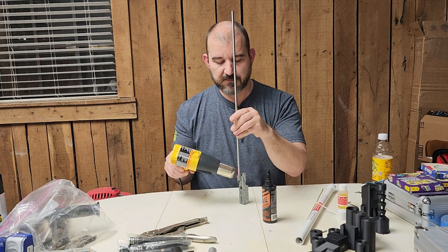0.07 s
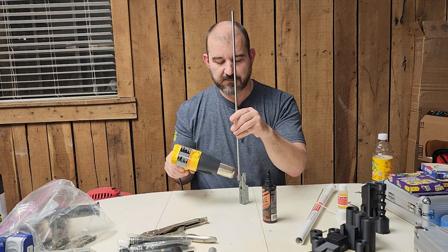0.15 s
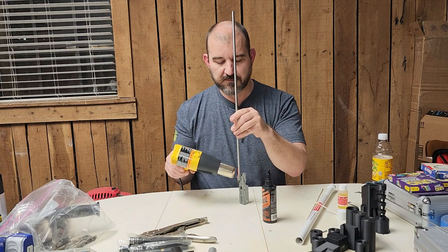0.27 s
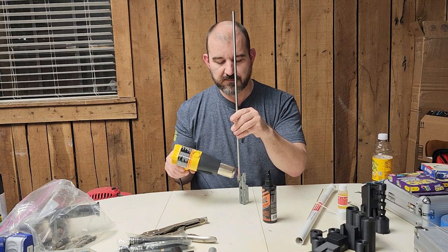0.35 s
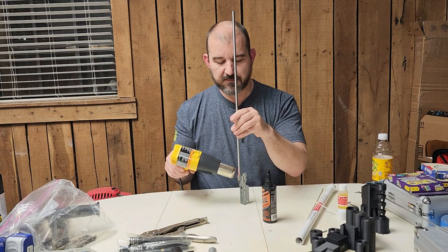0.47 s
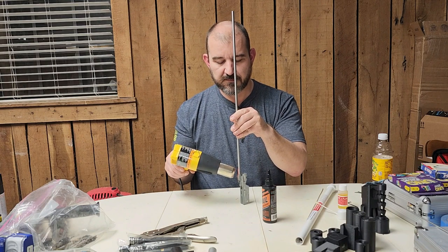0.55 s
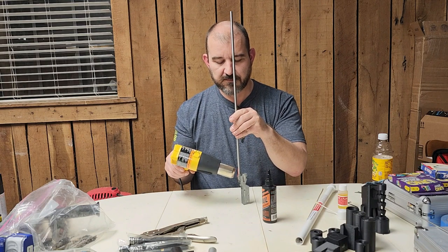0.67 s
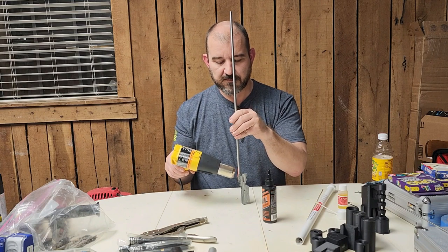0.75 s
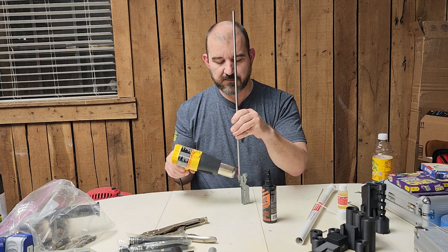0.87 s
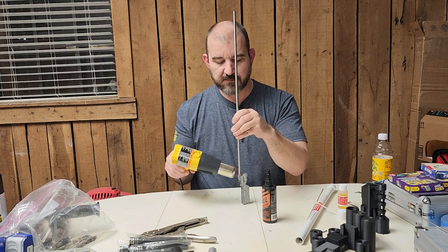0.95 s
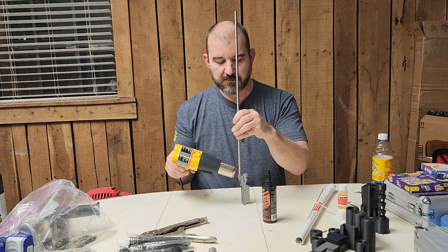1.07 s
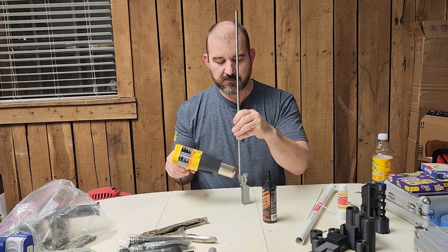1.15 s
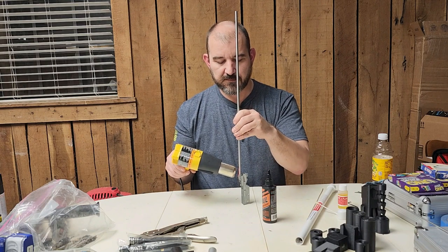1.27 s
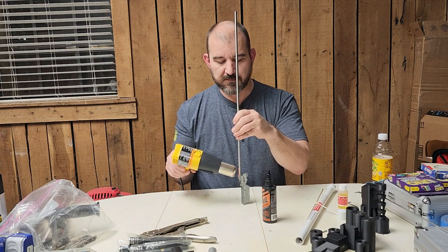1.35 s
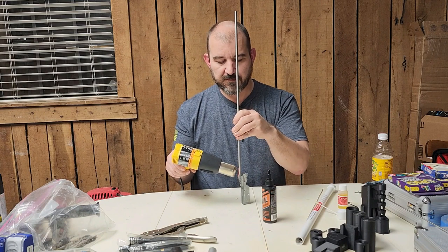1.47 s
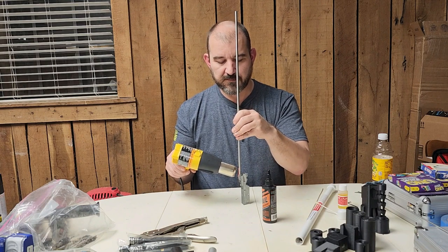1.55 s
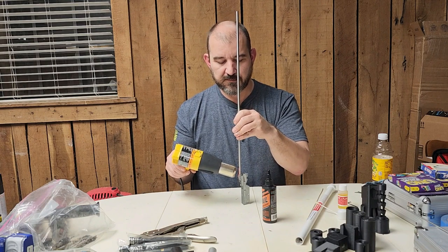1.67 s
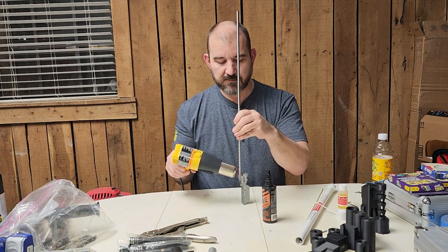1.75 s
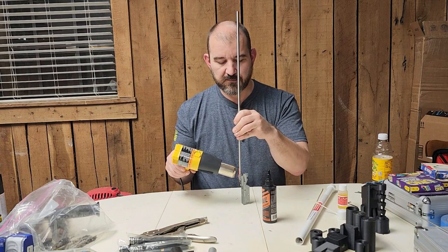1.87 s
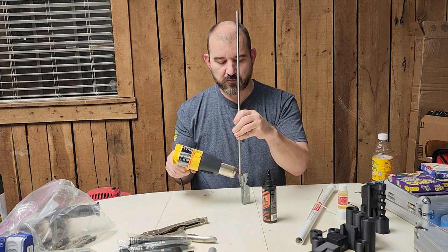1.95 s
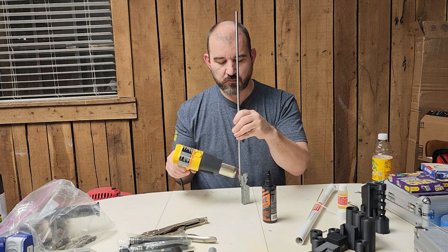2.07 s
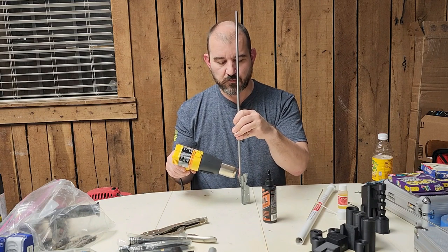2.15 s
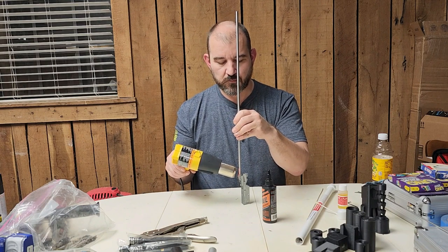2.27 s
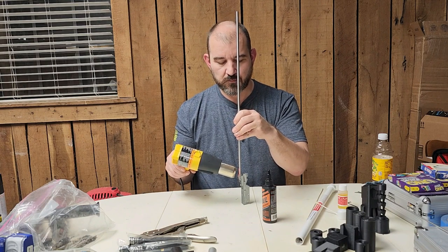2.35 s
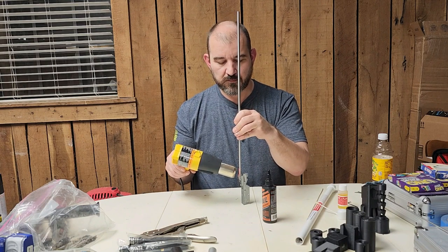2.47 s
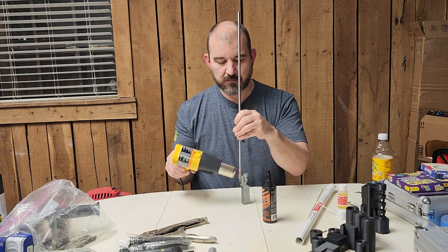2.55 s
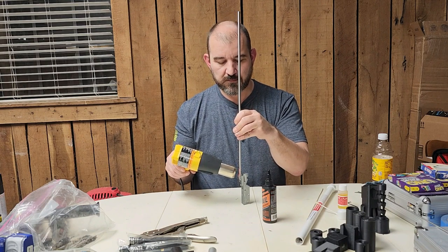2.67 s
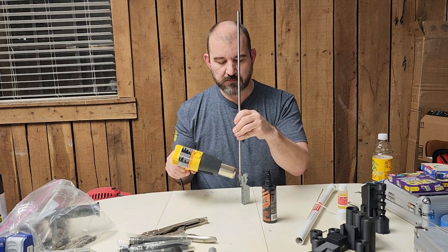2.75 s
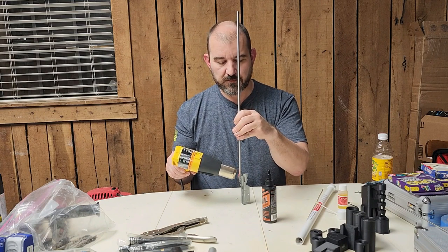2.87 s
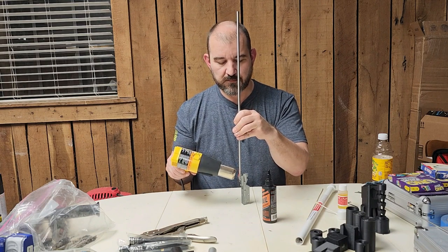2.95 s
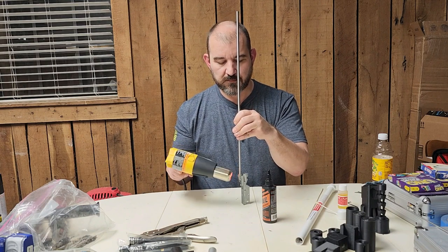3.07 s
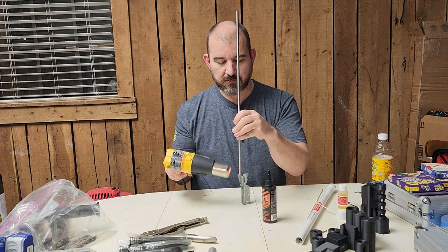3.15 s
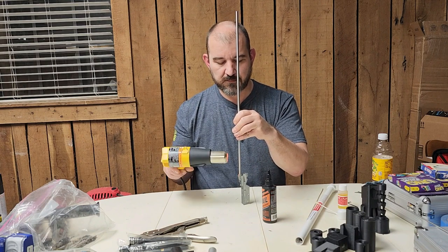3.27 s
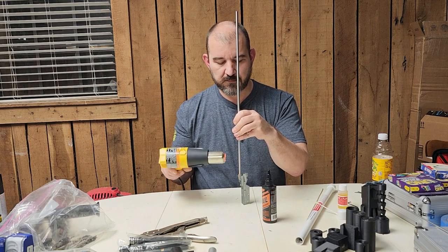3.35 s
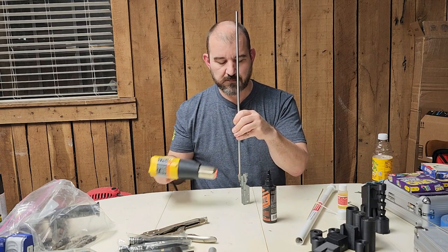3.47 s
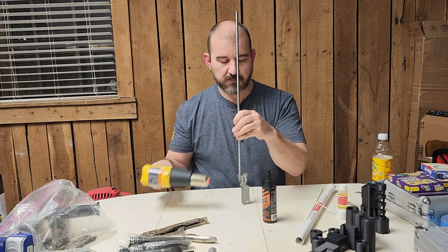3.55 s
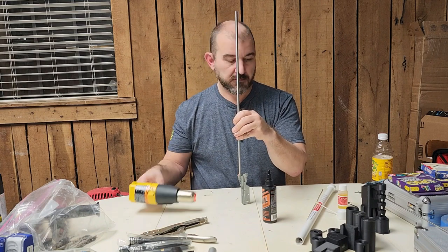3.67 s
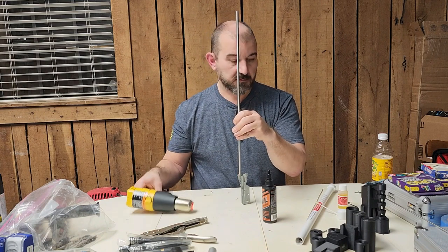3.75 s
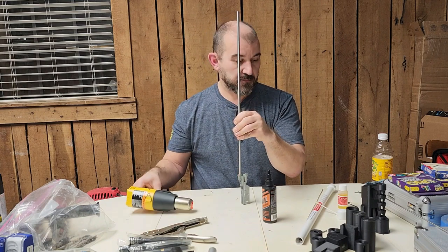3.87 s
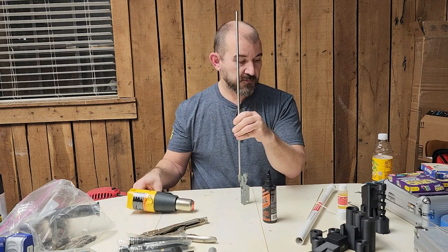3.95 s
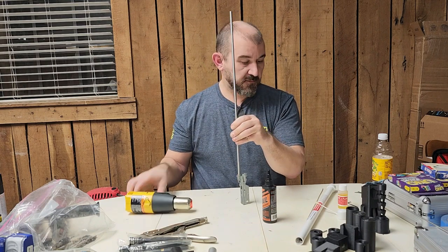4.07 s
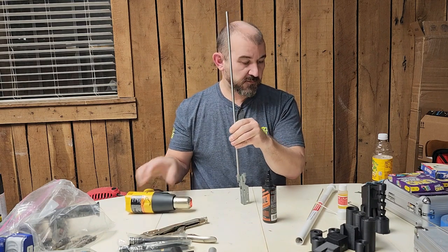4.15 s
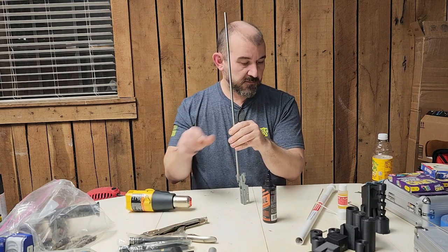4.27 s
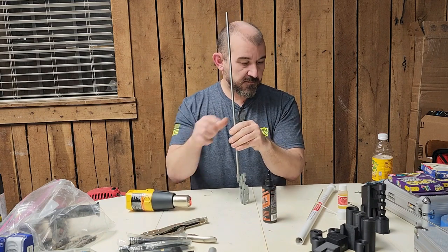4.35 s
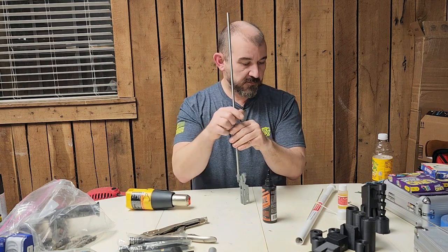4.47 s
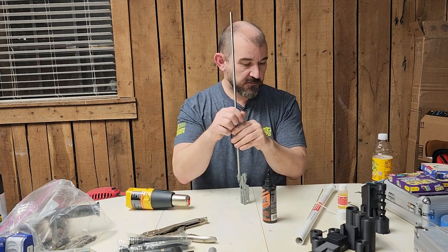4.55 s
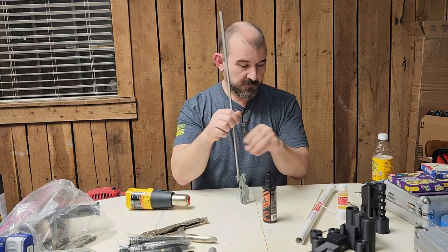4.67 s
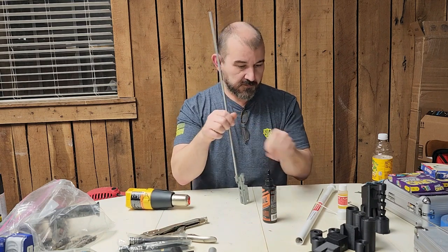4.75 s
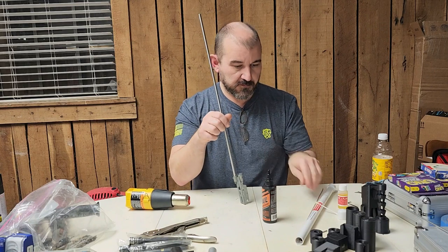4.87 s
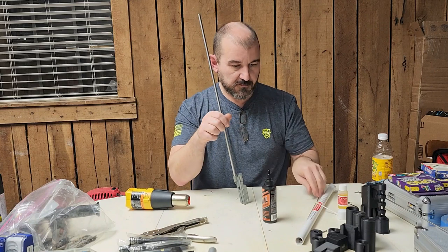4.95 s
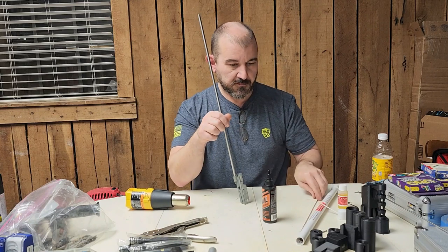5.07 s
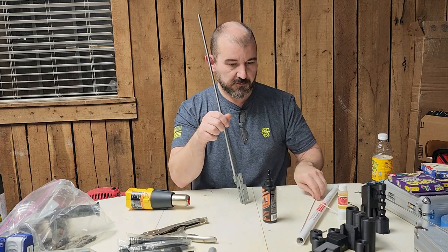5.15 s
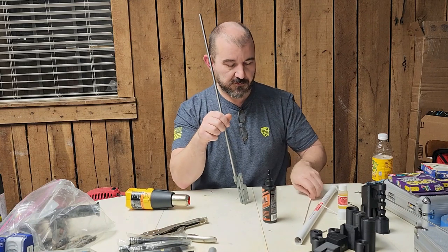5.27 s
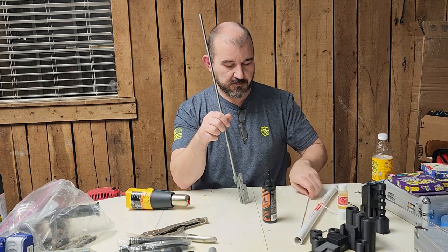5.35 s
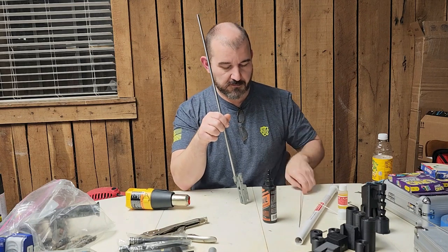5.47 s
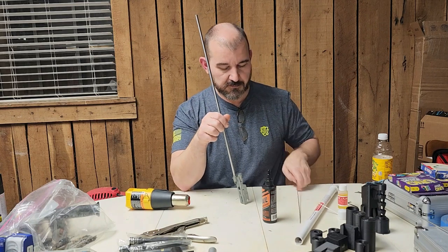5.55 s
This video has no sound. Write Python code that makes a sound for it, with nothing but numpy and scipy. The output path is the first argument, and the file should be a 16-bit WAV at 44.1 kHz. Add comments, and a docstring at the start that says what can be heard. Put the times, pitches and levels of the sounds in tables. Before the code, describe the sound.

Close stereo pickup in a short, dry room: constant buzzy fan whir and broad airflow, a small switch click with a dull body thud, then a quick fade of air. The gun meets the folding table with two sharp plastic knocks, a metallic nozzle clink and a few weaker bumps. Sleeves and fingers rustle faintly, with tiny ticks, above hum and ventilation rumble.

```python
"""Heat gun set down

A handheld heat gun whirs in a wooden workshop: motor tones follow the shaft speed, over rushing air noise.
It is switched off with a thud of its body and set down on a plastic folding table with two knocks and
some bounces, made of short pushes and cracks that ring the table, the gun body and the nozzle.
Hands and sleeves rustle as grainy noise, over the mains hum, noise rumble and faint hiss of the room."""
import sys
import numpy as np
from scipy import signal
from scipy.fft import rfft, irfft, next_fast_len
from scipy.io import wavfile

SR = 44100
rng = np.random.default_rng(int(sys.argv[2]) if len(sys.argv) > 2 else 0)


def inscribe(sig):
    """Save sig as 16-bit PCM at rate SR to the path in sys.argv[1].

    A 1-D sig is mono; a 2-D sig holds one channel per row.
    Samples are clipped to [-1, 1] before scaling.
    """
    pcm = np.round(np.clip(np.atleast_2d(sig).T, -1, 1) * 32767)
    wavfile.write(sys.argv[1], SR, pcm.astype(np.int16))


def amplitude_ratio(level_db):
    """Convert a level in decibels to the matching linear amplitude (field) ratio."""
    exponent = np.asarray(level_db, float) / 20
    return 10 ** exponent


N = 247401  # length in samples


def since(s):
    """Seconds gone by since a moment, 0 before it."""
    return np.maximum(np.arange(N) / SR - s, 0)


def window(start_s, end_s, edge_s):
    """1 between two times, with sloped edges."""
    t = np.arange(N) / SR
    return np.clip(np.minimum(t - start_s, end_s - t) / edge_s + .5, 0, 1)


def in_time(rows):
    """Columns of a curve table, one value a sample."""
    s, *columns = np.transpose(rows)
    return [np.interp(np.arange(N) / SR, s, c) for c in columns]


def at_hz(points, hz):
    """Read a table on a log-frequency axis."""
    p = np.array(points, float)
    return np.interp(np.log(np.maximum(hz, 1)), np.log(p[:, 0]), p[:, 1])


def rms_one(x):
    """Scale to unit rms."""
    return x / np.sqrt(np.mean(x ** 2) + 1e-20)


def drift(rate_hz):
    """Slow random wandering of spread 1, drawn every 64 samples."""
    r = np.exp(-2 * np.pi * rate_hz * 64 / SR)
    slow = signal.lfilter([1], [1, -2 * r, r * r], rng.standard_normal(N // 64 + 2002))
    slow = rms_one(slow[2000:])  # leave out the start of the filter
    return np.interp(np.arange(N) / 64, np.arange(len(slow)), slow)


def ring(clicks, modes):
    """Clicks set a bank of decaying sines ringing."""
    out = 0
    for hz, db, t60 in modes:
        r = amplitude_ratio(-60 / (t60 * SR))
        w = 2 * np.pi * hz / SR
        out = out + amplitude_ratio(db) * signal.lfilter([0, np.sin(w)], [1, -2 * r * np.cos(w), r * r], clicks + 1e-18)
    return out


# how alike left and right are in spread sound: (frequency [Hz], likeness [-1 to 1])
LIKENESS = [(60, 1), (130, 0.81), (290, 0.79), (640, 0.51), (1410, -0.046), (3100, 0.15), (6820, -0.3),
            (15000, -0.18)]


def stereo(mid, side, hz):
    """Mix two independent noises, or their spectra, so that left and right are as alike as the table says."""
    alike = np.clip(at_hz(LIKENESS, hz), -.99, .99)
    return np.sqrt(1 + alike) * mid + np.sqrt(1 - alike) * side * [[1], [-1]]


def spread_noise(spectrum, peaks=()):
    """Stereo noise of a given colour, as alike in the two channels as sound from all around; mid rms 1."""
    size = next_fast_len(N)
    hz = np.arange(size // 2 + 1) * SR / size
    db = at_hz(spectrum, hz)
    db = db + sum(lift / (1 + (2 * (hz - f) / w) ** 2) for f, w, lift in peaks)
    mid, side = rfft(rng.standard_normal((2, size))) * amplitude_ratio(db)
    out = irfft(stereo(mid, side, hz), size)[:, :N]
    return out / np.std(out.mean(axis=0))


SWITCH_OFF_S, COAST_S = 3.31, 0.77  # the shaft then slows with this time constant


def coasting_db():
    """Shaft speed against full speed, in dB: an exponential slowing after the switch."""
    return -20 / np.log(10) * since(SWITCH_OFF_S) / COAST_S


# shaft speed while powered: (time [s], speed [turns per s])
SPEED = [(0, 235.35), (.45, 235.5), (.9, 235.15), (1.2, 235.5), (1.7, 235.18), (2.1, 235.6), (2.65, 235.87),
         (3.0, 235.7)]
# motor tones: (multiple of the shaft speed, rms level [dB], left against right [dB])
TONES = [(1, -47.5, 1), (2, -49, 2), (3, -48, 0), (4, -67, 0), (5, -66, -5), (6, -53, 7), (7, -56, 8),
         (8, -56, 15), (9, -62, 14), (10, -55, 7), (11, -50, 1), (12, -61, 0), (13, -62, 11), (14, -66, 7),
         (15, -66, 12), (16, -64, 13), (17, -60, 11), (18, -62, 3), (19, -70, 8), (20, -64, 11),
         (21, -67, 7), (22, -65, 10), (23, -74, 3), (24, -64, 12), (25, -72, 3), (26, -72, 10),
         (27, -74, 8), (28, -69, 6), (29, -73, 8), (30, -72, 11), (31, -73, 9), (32, -71, 10), (33, -75, 7),
         (34, -78, 5), (35, -74, 5), (36, -75, 6)]
# side lines that stand out: (multiple, +1 above or -1 below, rms level [dB])
LOUD_SIDES = [(3, 1, -65), (4, -1, -67), (5, 1, -67), (7, -1, -64), (10, 1, -64), (10, -1, -67),
              (11, -1, -59)]
# tones that swell or sink while the hand turns the gun: (multiple, start [s], length [s], change [dB])
TURNS = [(3, 2.9, 0.61, -4.5), (6, 2.3, 0.55, 1), (8, 2.2, 0.87, 1), (11, 2.1, 1.8, -2),
         (12, 3.11, 0.12, 11), (14, 3.19, .06, 12), (16, 3.06, 0.18, 9)]
RIPPLE_HZ = 119.95
SIDE_LINE_DB = -38  # other side lines against a first tone; they grow in proportion to the multiple
LIFT_S, LIFT_FADE_DB_PER_S = 2.95, 13  # the gun is lifted away and its tones fade
TONE_DEATH_DB_PER_S = 150  # without current the tones die fast


def motor():
    """Tones on the shaft multiples; the rectified supply adds a side line below and above each."""
    speed = in_time(SPEED)[0] * amplitude_ratio(coasting_db()) + 0.054 * drift(7.3)
    running = int((SWITCH_OFF_S + .25) * SR)
    turn = (2 * np.pi * np.cumsum(speed) / SR)[:running]
    ripple = 2 * np.pi * RIPPLE_HZ * np.arange(running) / SR
    out = np.zeros((2, N))
    loud = {(k, way): db for k, way, db in LOUD_SIDES}
    for k, db, pan_db in TONES:
        start = rng.uniform(0, 2 * np.pi, 3)
        lag = rng.normal(0, min(0.045 * k, 2.0))  # radians; high tones reach the two microphones out of step
        # the hand moves the gun through the room pattern
        waver = amplitude_ratio(min(.2 + .11 * k, 1.5) * drift(4)[:running])
        for multiple, start_s, length_s, turn_db in TURNS:
            if round(multiple) == k:
                waver = waver * amplitude_ratio(turn_db * window(start_s, start_s + length_s, 0.023)[:running])
        usual_db = db + SIDE_LINE_DB + 20 * np.log10(k)
        below = amplitude_ratio(loud.get((k, -1), usual_db)) * np.exp(1j * (start[1] - ripple))
        above = amplitude_ratio(loud.get((k, 1), usual_db)) * np.exp(1j * (start[2] + ripple))
        wave = np.exp(1j * (k * turn + start[0])) * (amplitude_ratio(db) + below + above)
        sides = np.array([amplitude_ratio(pan_db / 2), amplitude_ratio(-pan_db / 2) * np.exp(1j * lag)])
        level = np.sqrt(8) / max(abs(sides.sum()), 1)  # the table level holds for the mean of both channels
        out[:, :running] += np.real(sides[:, None] * wave) * waver * level
    return out * amplitude_ratio(-LIFT_FADE_DB_PER_S * since(LIFT_S) - TONE_DEATH_DB_PER_S * since(SWITCH_OFF_S))


ECHO_COUNT, ECHO_DB = 7, -19
ECHO_FIRST_S, ECHO_LAST_S = 0.0036, .03


def near_echoes(x):
    """Table, body and back wall return a few copies, which ripple the colour of a steady sound."""
    out = x.copy()
    for share, sign in rng.random((ECHO_COUNT, 2)):
        lag = 1 + int((ECHO_FIRST_S + share * (ECHO_LAST_S - ECHO_FIRST_S)) * SR)
        out += amplitude_ratio(ECHO_DB) * np.sign(sign - .5) * np.roll(x, lag, axis=1)
    return out / np.sqrt(1 + ECHO_COUNT * amplitude_ratio(2 * ECHO_DB))


# colour of the rushing air: (frequency [Hz], relative level per Hz [dB])
AIR = [(120, -36.5), (200, -5), (240, -12.5), (311, -17), (465, -8), (519, -13), (709, -9.5), (1120, -8.5),
       (1400, -7.5), (2210, -9), (2560, -5.5), (2860, -12), (9930, -31), (11900, -20), (16000, -38)]
# resonances of barrel and housing in the air noise: (frequency [Hz], width [Hz], lift [dB])
BARREL = [(566, 79, 8), (632, 41, 8), (867, 79, 7.5), (1137, 68, -5), (1350, 120, 3.5), (1441, 54, 5.5),
          (1590, 150, -3.5), (2370, 430, -4), (2750, 510, 0.5), (2870, 220, -5.5), (3604, 240, -11),
          (3734, 620, 8), (4700, 770, -3.5), (5480, 300, 3), (7700, 1600, 7), (11960, 1040, -4.5)]
AIR_DB = -41.5
AIR_POWER, TREBLE_POWER = 4.3, 5.4  # jet pressure goes as speed to this power, its treble by a further power


def air():
    """The fan's jet is coloured noise; the treble dies first as it slows."""
    jet = near_echoes(spread_noise(AIR, BARREL))
    treble = signal.sosfilt(signal.butter(1, 3500, "high", fs=SR, output="sos"), jet)
    level = amplitude_ratio(AIR_DB + AIR_POWER * coasting_db() + 0.25 * drift(13.0))
    return level * (jet + (amplitude_ratio(TREBLE_POWER * coasting_db()) - 1) * treble)


# blows on the table and gun body; the first is the body thud of the switch:
# (time [s], push into the table [dB], contact hardness [Hz], push into the gun body against it [dB],
#  crack level [dB])
BLOWS = [(3.345, -56, 1300, 24, -74), (3.6209, -39.5, 1990, 12, -41.5), (3.8087, -36.5, 2360, 17, -25),
         (3.8104, -18, 2460, 7.5, -33), (3.859, -44, 2400, 15, -67), (3.9593, -22, 2460, 14, -20),
         (3.9613, -17.5, 2380, -2, -28.5), (4.0709, -24.5, 800, -9, -50), (4.117, -26, 800, 0, -46),
         (4.132, -35.5, 800, 15.5, -64), (4.176, -31.5, 1190, -9, -66), (4.209, -45.5, 2400, -1, -74),
         (4.353, -42, 447, 20, -72), (4.405, -45, 454, 26, -74), (4.498, -44, 463, 30, -64),
         (5.051, -45.5, 696, 13, -72), (5.151, -52.5, 2400, 9, -58), (5.389, -60, 2000, -2, -74)]
# table top modes: (frequency [Hz], level [dB], time to fall 60 dB [s])
TABLE = [(135.4, -9, 0.064), (169, -0.5, 0.057), (211.6, -6, 0.088), (304.6, -9.5, 0.18), (359, -0.5, 0.13),
         (445, -4.5, 0.16), (514, -7, 0.0096), (530, -5, .1), (613, -10, 0.11), (664, -6.5, 0.15)]
# gun body modes: (frequency [Hz], level [dB], time to fall 60 dB [s])
BODY = [(602.5, -10.5, 0.14), (838, -16, 0.12), (912, -11, 0.056), (1300, -32, .04), (1410, -6, 0.1),
        (1502, 1, 0.033), (1643, -4.5, 0.078), (1980, -26.5, 0.027), (3010, -3, 0.026)]
# colour of crack and rattle: (frequency [Hz], relative level per Hz [dB])
CRACK = [(800, -5.5), (2000, 10.5), (2600, 0.5), (3300, 4.5), (5000, -5.5), (7500, -5), (10000, -17.5),
         (12000, -10), (16000, -23.5)]
CRACK_RISE_S, CRACK_T60_S = 0.0011, 0.016
RATTLE_T60_S, RATTLE_DB = 0.18, -10.5  # level against the crack
TABLE_LAG_S = 0.0005  # the bending wave needs time to move the whole top


def blows():
    """Low-passed pushes ring table top and gun body, with a noisy crack and a short rattle of loose parts."""
    top, body, crack = np.zeros((3, N))
    push = np.r_[1., np.zeros(2047)]
    t = np.arange(SR // 5) / SR
    dying = amplitude_ratio(-60 * t / CRACK_T60_S) + amplitude_ratio(RATTLE_DB - 60 * t / RATTLE_T60_S)
    dying = dying * (1 - np.exp(-t / CRACK_RISE_S))
    lag = int(TABLE_LAG_S * SR)
    for s, db, hard_hz, body_db, crack_db in BLOWS:
        r = np.exp(-2 * np.pi * hard_hz / SR)  # harder contacts push more briefly
        force = amplitude_ratio(db) * signal.lfilter([(1 - r) ** 4], np.poly([r, r, r, r]), push)
        at = int(s * SR)
        top[at + lag:at + lag + len(push)] += force
        body[at:at + len(push)] += amplitude_ratio(body_db) * force
        crack[at:at + len(t)] += amplitude_ratio(crack_db) * dying
    return ring(top, TABLE) + ring(body, BODY) + crack * spread_noise(CRACK).mean(axis=0)


# the metal nozzle lands with a bounce: (time [s], strength [dB])
NOZZLE_HITS = [(3.9589, -16), (4.007, -43.5)]
# nozzle modes: (frequency [Hz], level [dB], time to fall 60 dB [s])
NOZZLE = [(743, 5.5, 0.046), (1092, -1, 0.069), (1200, -11, 0.059), (1587, -8.5, .03), (1577, 2.5, 0.06),
          (1840, -1.5, 0.078), (2290, -11, .06), (2780, -17, 0.049)]
NOZZLE_HARD_HZ = 3500


def nozzle():
    """Single clicks, softened by a low-pass, ring the metal nozzle."""
    clicks = np.zeros(N)
    for s, db in NOZZLE_HITS:
        clicks[int(s * SR)] = amplitude_ratio(db)
    clicks = signal.lfilter(*signal.butter(2, NOZZLE_HARD_HZ, fs=SR), clicks + 1e-18)
    return ring(clicks, NOZZLE)


# switch and small hard ticks: (time [s], starting level, twice the rms [dB],
#                               centre frequency [Hz], time to fall 60 dB [s])
TICKS = [(3.208, -40, 12800, 0.015), (3.259, -26.5, 5930, 0.012), (3.272, -43, 10750, 0.013),
         (3.334, -31, 12000, 0.026), (3.344, -31, 2500, 0.045), (4.31, -59.5, 10540, 0.079),
         (4.361, -59.5, 11330, 0.081), (4.497, -58.5, 7000, 0.029), (5.087, -57.5, 9500, 0.098),
         (5.151, -63, 2550, .03), (5.191, -48, 2520, .04)]
TICK_OCTAVES = 1.1  # spread around the centre


def ticks():
    """Short dying noise bursts around a centre pitch."""
    out, t = np.zeros(N), np.arange(8192) / SR
    hz = np.maximum(np.arange(4097) * SR / 8192, 1)
    for s, db, centre_hz, t60 in TICKS:
        band = np.exp(-(np.log2(hz / centre_hz) / TICK_OCTAVES) ** 2)
        burst = rms_one(irfft(rfft(rng.standard_normal(len(t))) * band))
        at = int(s * SR)
        out[at:at + len(t)] += amplitude_ratio(db - 60 * t / t60) * burst / 2
    return out


# sleeves and fingers sliding: (start [s], rise [s], hold [s], level [dB], bright part against it [dB])
RUSTLES = [(3.484, 0.033, 0.37, -61, -12.5), (3.838, .02, 0.27, -49, -17.5), (4.196, 0.017, .26, -58, -20),
           (4.49, 0.0062, 0.013, -58, -20), (4.62, .03, 0.063, -66.5, -19.5),
           (5.044, .02, 0.033, -67.5, -10), (5.135, 0.036, 0.012, -49.5, -21.5),
           (5.336, 0.053, 0.032, -57.5, -26), (5.504, 0.041, .05, -67.5, -11.5)]
# colour of the dull part: (frequency [Hz], relative level per Hz [dB])
LOW_RUSTLE = [(300, -2), (700, 1), (1500, -1.5), (3000, -13.5), (5000, -24.5), (9000, -41)]
# colour of the bright part: (frequency [Hz], relative level per Hz [dB])
HIGH_RUSTLE = [(2000, -16), (3400, 1.5), (5000, -9.5), (7600, 0.5), (9500, -19), (12000, -8), (16000, -31)]
HISS_DB, HISS_BRIGHT_DB = -65, -24.5  # faint steady hiss of the room; bright part against the dull
RUSTLE_FALL_DB_PER_S = 137


def rustle_and_hiss():
    """Cloth and skin slide as grainy two-colour noise; strokes rise, hold and fade over a faint room hiss."""
    low, high = amplitude_ratio(2 * HISS_DB), amplitude_ratio(2 * (HISS_DB + HISS_BRIGHT_DB))  # powers
    for s, rise_s, hold_s, db, bright_db in RUSTLES:
        rise = np.minimum(since(s) / max(rise_s, .001), 1)
        fall_db = RUSTLE_FALL_DB_PER_S * since(s + rise_s + hold_s)
        power = rise ** 2 * amplitude_ratio(2 * (db - fall_db))
        low, high = low + power, high + power * amplitude_ratio(2 * bright_db)
    dull = np.sqrt(low) * amplitude_ratio(1.7 * drift(60)) * spread_noise(LOW_RUSTLE)
    bright = np.sqrt(high) * amplitude_ratio(2 * drift(80)) * spread_noise(HIGH_RUSTLE)
    return dull + bright


# faint thin squeaks: (start [s], end [s], frequency [Hz], rms level [dB], width [Hz])
SQUEAKS = [(4.2, 4.45, 7700, -81, 80), (4.2, 4.42, 3400, -74, 110), (4.21, 4.36, 1160, -61, 20),
           (4.43, 4.54, 1160, -62, 20), (4.61, 4.65, 7450, -80, 150), (5.47, 5.53, 6400, -84, 150)]


def squeaks():
    """Narrow bands of noise that flicker."""
    out, noise = 0, rng.standard_normal((2, N))
    for start_s, end_s, hz, db, width_hz in SQUEAKS:
        band = signal.butter(2, [hz - width_hz / 2, hz + width_hz / 2], "band", fs=SR, output="sos")
        out = out + amplitude_ratio(db) * window(start_s, end_s, .02) * rms_one(signal.sosfilt(band, noise))
    return out


# steady hum of the room: (frequency [Hz], rms level [dB])
HUM = [(119.98, -40.5), (150, -77), (240, -57.5), (269, -60.5), (359.94, -57.5)]
# colour of the ventilation rumble: (frequency [Hz], relative level per Hz [dB])
RUMBLE = [(15, -59), (25, -30), (49, -13.5), (87, -10), (102, -5.5), (123, -9.5), (153, -9.5), (363, -23),
          (394, -23.5), (575, -33.5), (659, -33), (1940, -52), (2110, -39.5), (2910, -69), (16000, -107)]
RUMBLE_DB = -46


def room_tone():
    """Mains lines that waver a little, over ventilation rumble."""
    t = np.arange(N) / SR
    lines = 0
    for hz, db in HUM:
        level = amplitude_ratio(db + 0.89 * np.sqrt(hz / HUM[0][0]) * drift(2.7))
        phase = rng.uniform(0, 2 * np.pi) + 0.086 * drift(0.79)
        lines = lines + level * np.sqrt(2) * np.sin(2 * np.pi * hz * t + phase)
    return lines + amplitude_ratio(RUMBLE_DB) * spread_noise(RUMBLE)


# how long the room rings: (frequency [Hz], time to fall 60 dB [s])
ROOM_T60 = [(100, 0.36), (500, 0.23), (2000, 0.25), (8000, 0.23), (15000, 0.26)]
ROOM_DB, ROOM_GAP_S = -9, .006


def walls(x):
    """Diffuse echoes: octave bands of noise, each dying at its own rate, after a short gap."""
    t, tail = np.arange(SR // 2) / SR, 0
    for hz in 125 * 2. ** np.arange(8):
        edges = [hz / np.sqrt(2), min(hz * np.sqrt(2), .45 * SR)]
        band = signal.butter(2, edges, "band", fs=SR, output="sos")
        noise = signal.sosfilt(band, rng.standard_normal((2, len(t))))
        mid, side = noise * amplitude_ratio(-60 * t / at_hz(ROOM_T60, hz))
        tail = tail + stereo(mid, side, hz)
    tail = tail * np.clip((t - ROOM_GAP_S) / 0.0059, 0, 1)
    tail = tail / np.sqrt(np.sum(tail ** 2) / 2)
    return amplitude_ratio(ROOM_DB) * signal.fftconvolve(x[None], tail, axes=1)[:, :N]


# colour of the two microphones: (frequency [Hz], left minus right [dB])
TILT = [(60, 0), (99, 1.5), (160, -0.5), (270, 2), (450, -4.5), (740, 2), (1220, 4), (2010, 5.5), (3330, 7),
        (5500, 13.5), (9080, 9), (15000, -12.5)]


def microphones(x):
    """The two microphones differ in colour."""
    size = next_fast_len(N)
    half = at_hz(TILT, np.arange(size // 2 + 1) * SR / size) / 2
    return irfft(rfft(x, size) * amplitude_ratio(np.array([half, -half])), size)[:, :N]


def scene():
    """All sources at the two microphones."""
    # small bodies radiate no deep bass
    low_cut = signal.butter(4, 105, "high", fs=SR, output="sos")
    hits = signal.sosfilt(low_cut, blows() + nozzle() + ticks())
    around = air() + hits + walls(hits) + rustle_and_hiss() + squeaks() + room_tone()
    return motor() + microphones(around)


def top_cut(x):
    """Nothing passes above the cut-off."""
    return signal.sosfilt(signal.butter(12, 15900, fs=SR, output="sos"), x)


def record(dry):
    """Peaks are rounded softly."""
    mix = 1.223 * np.tanh(dry / 1.197)
    return top_cut(mix)


dry = scene()
out = record(dry)
inscribe(out)
```